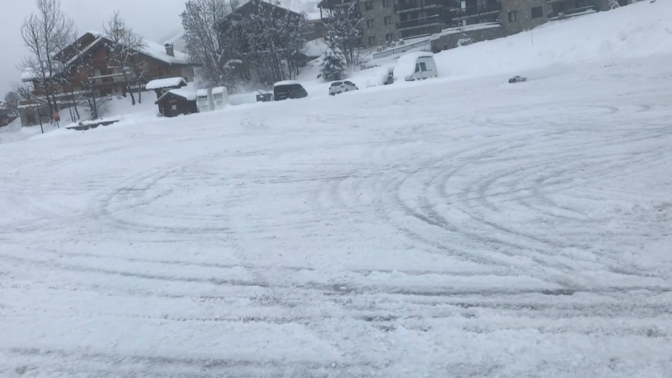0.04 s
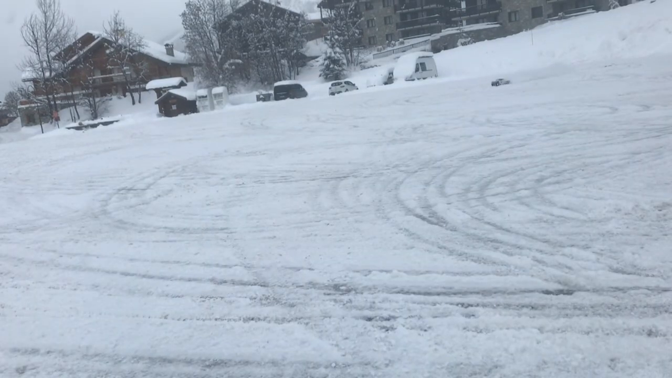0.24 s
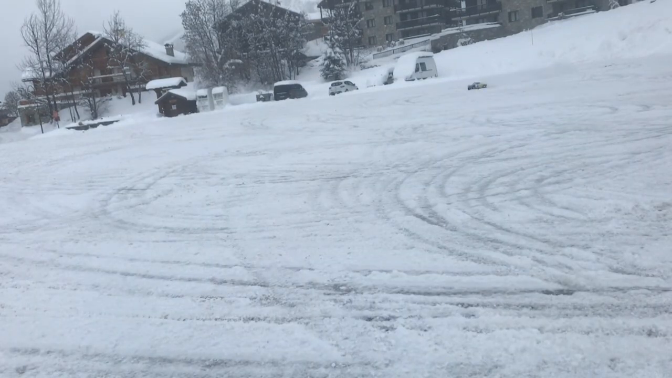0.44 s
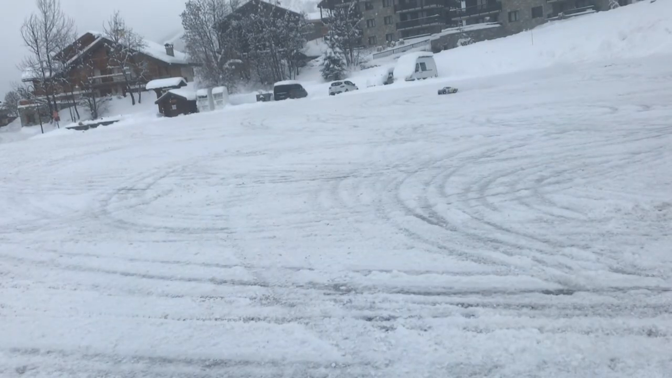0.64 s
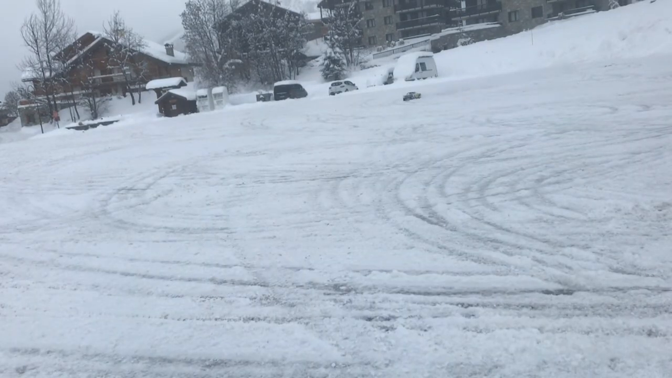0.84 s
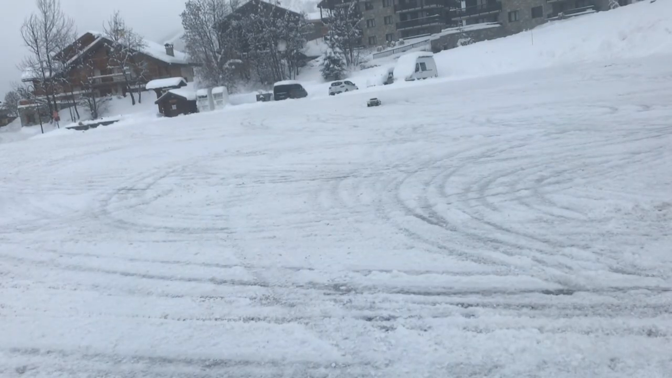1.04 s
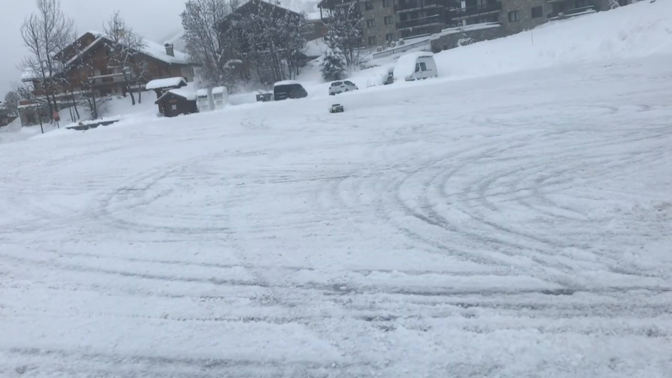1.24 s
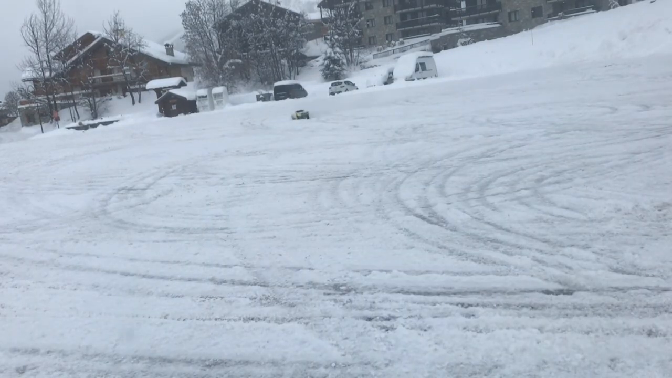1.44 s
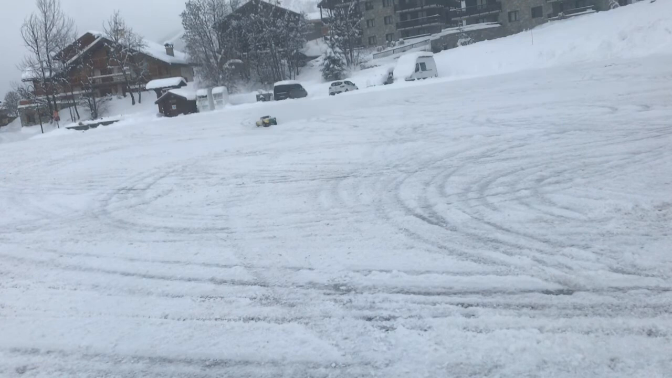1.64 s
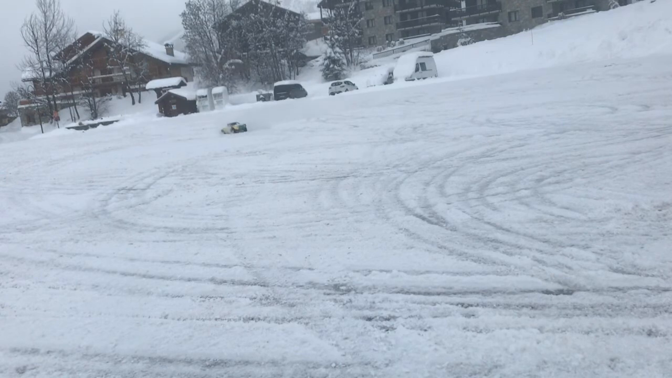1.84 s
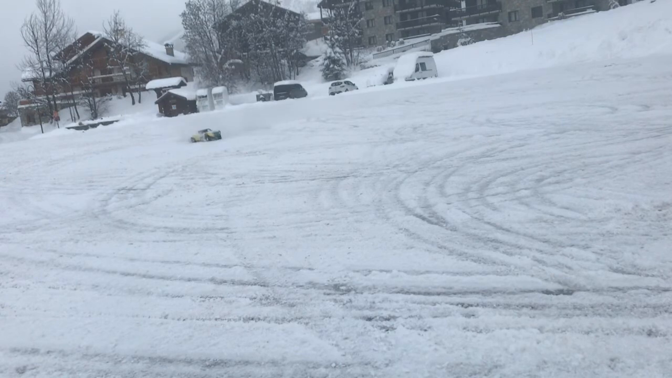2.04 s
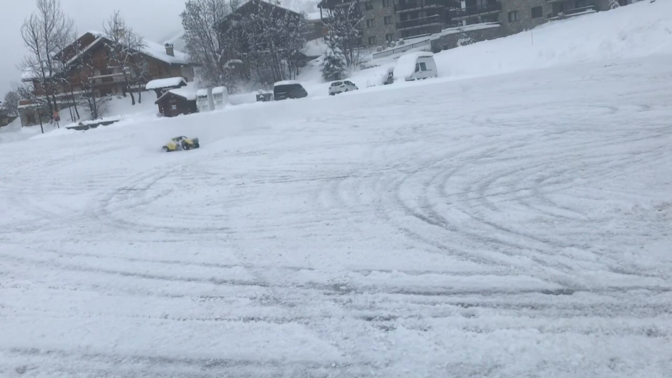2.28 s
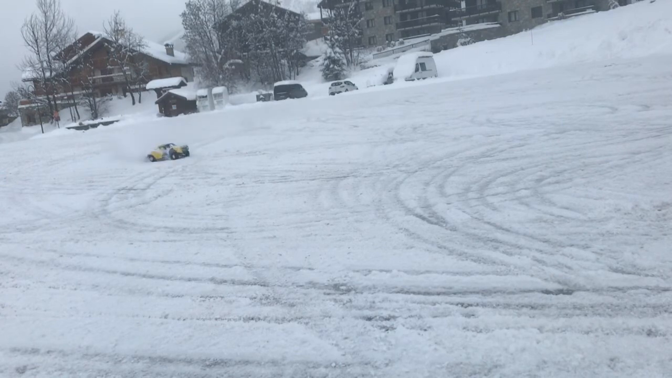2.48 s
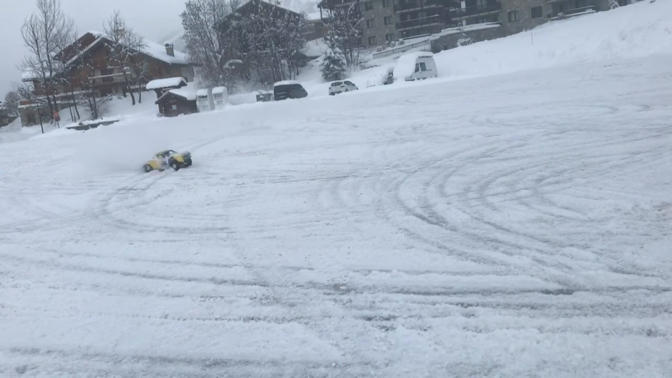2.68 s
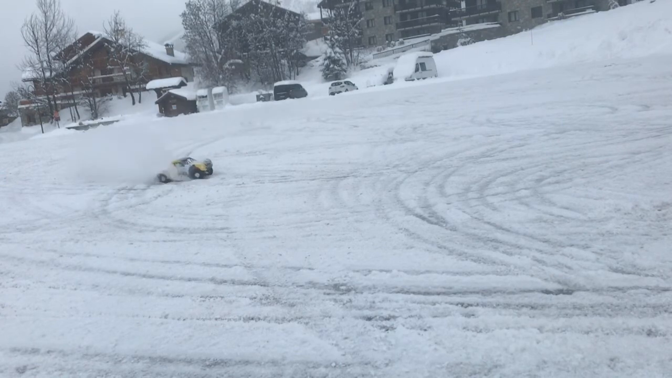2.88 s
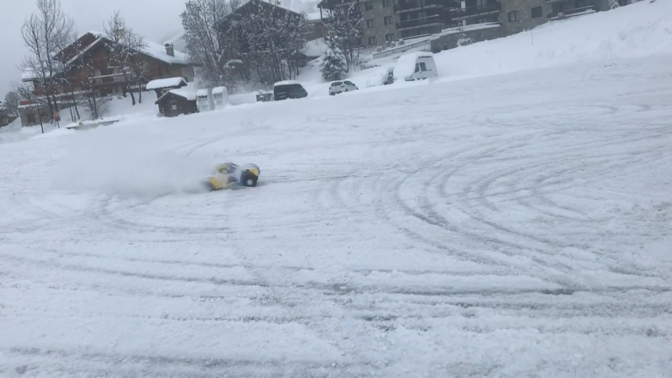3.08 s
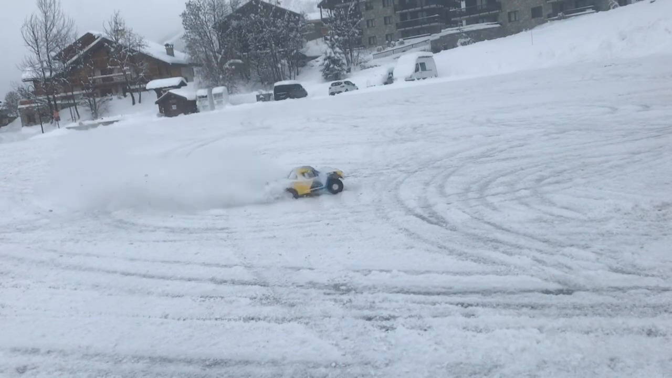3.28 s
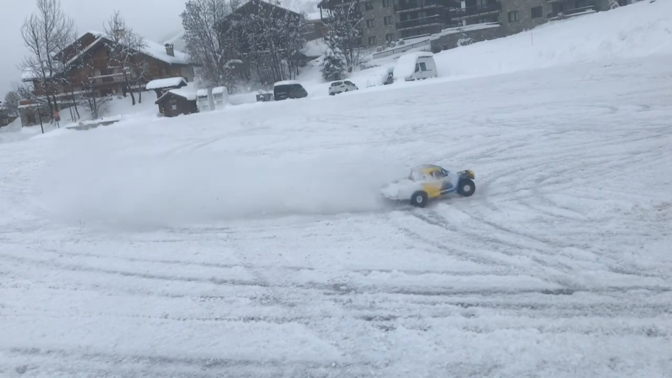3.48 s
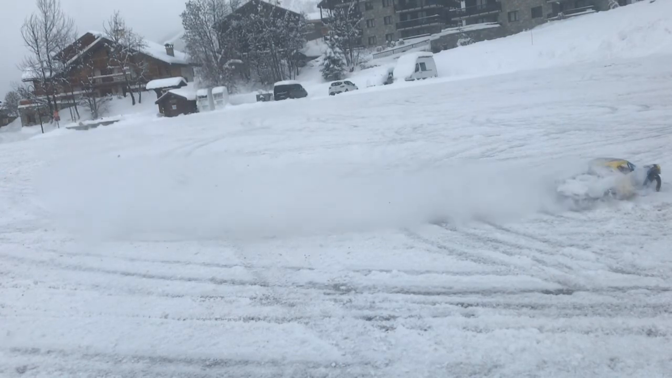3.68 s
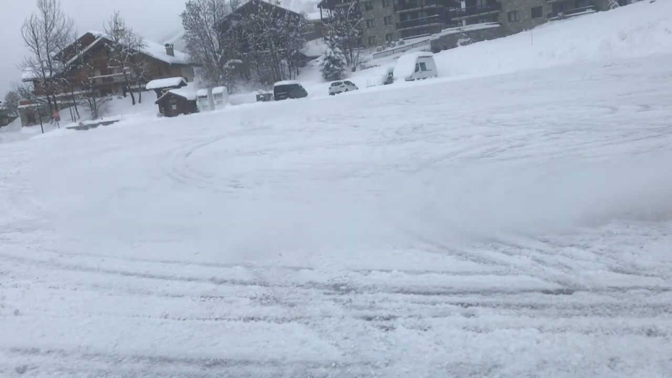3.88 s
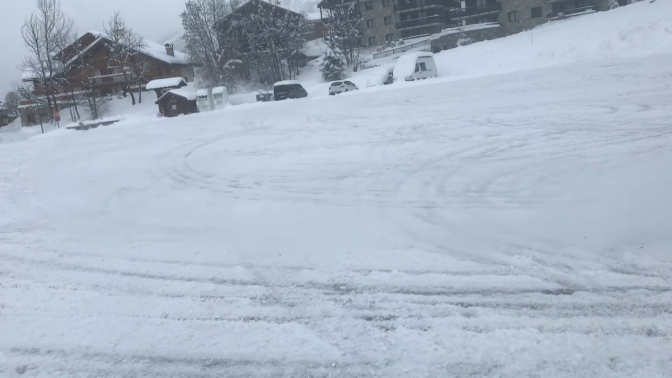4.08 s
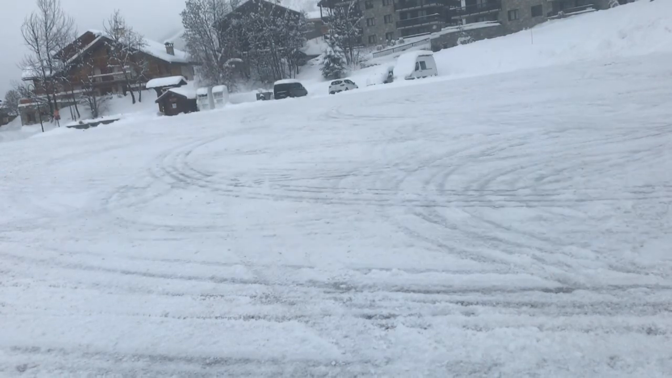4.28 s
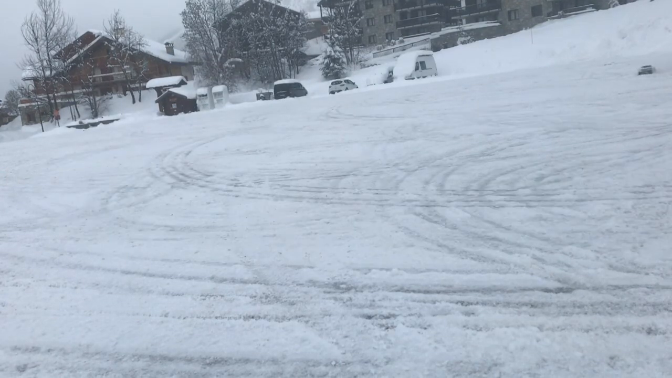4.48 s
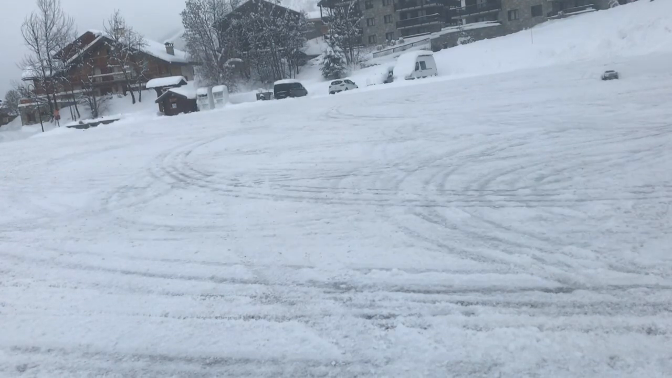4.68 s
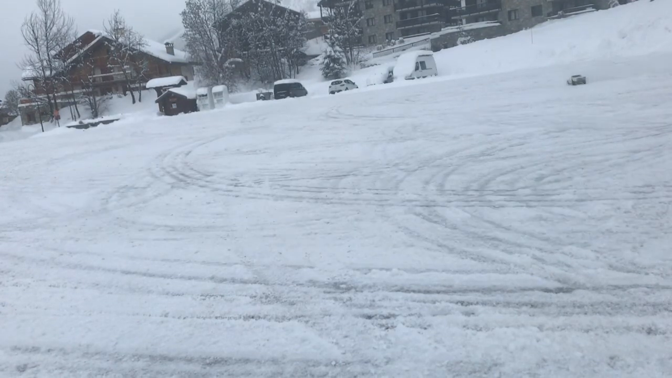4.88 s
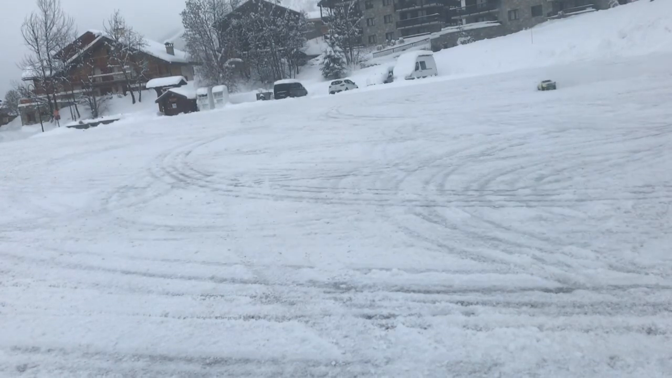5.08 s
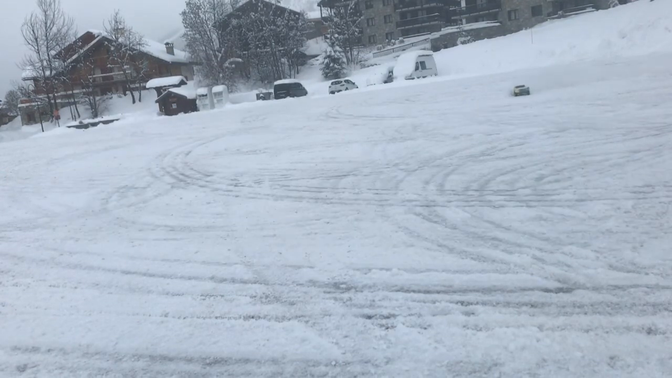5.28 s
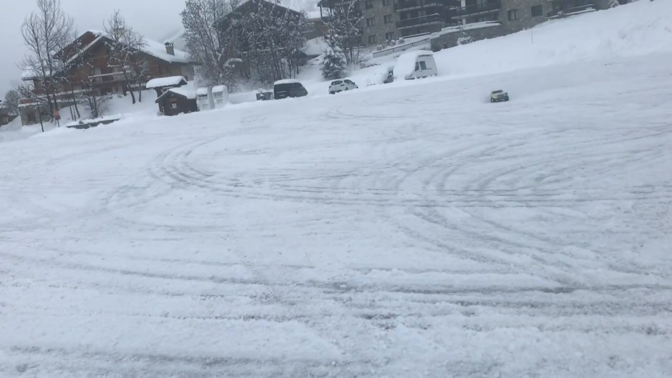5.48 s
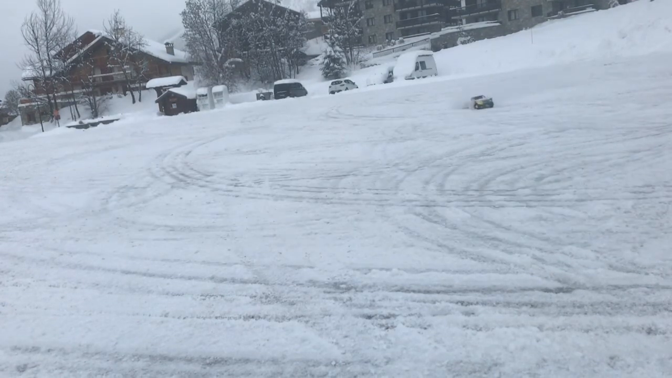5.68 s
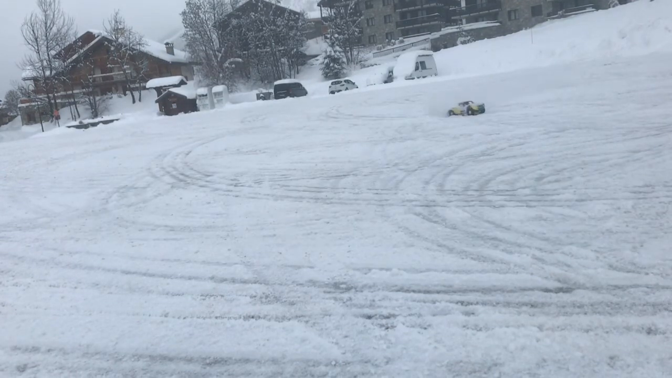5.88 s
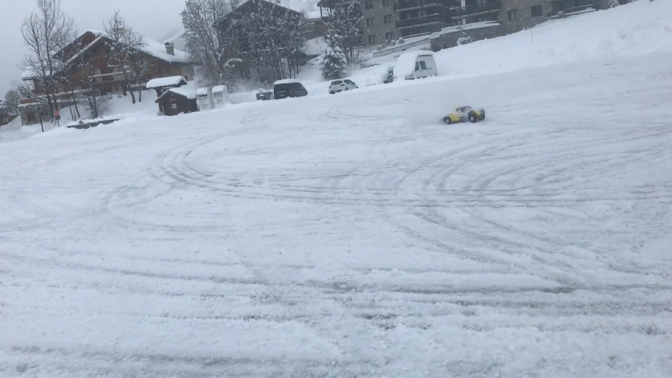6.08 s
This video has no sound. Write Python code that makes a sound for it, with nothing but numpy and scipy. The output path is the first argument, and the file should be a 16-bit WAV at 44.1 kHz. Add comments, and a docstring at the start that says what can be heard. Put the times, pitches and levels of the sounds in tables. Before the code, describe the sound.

A far-off electric buzz with a hollow plastic resonance circles over snow. The whine wavers and briefly bogs as tyres dig in, with squeaky crust, bright spray and little ice clicks. After a noisy close pass with hard crunching bursts, everything suddenly drops quiet; the truck is distant again, then nears with fresh crackles. The microphone stays still outdoors and sounds slightly dull at the very top.

```python
"""A thin shaft tone and plastic drone come first, far across a snowy field, over a faint steady hiss.
A small electric truck circles, comes close and passes the microphone; an abrupt cut returns to a far lap.
Bumps shake its plastic shell, modelled as resonances driven by noise; shaft and gears are wavering sines.
The tyres crunch, hiss, squeak and spray snow: coloured noise and grains, with ticks of ice and rut bursts.
"""
import sys
import numpy as np
from scipy import signal
from scipy.fft import rfft, irfft
from scipy.io import wavfile

SR = 44100
rng = np.random.default_rng(int(sys.argv[2]) if len(sys.argv) > 2 else 0)


def put_to_file(sound):
    """Save the sound as 16-bit audio at rate SR, in the file named by the first command-line argument."""
    columns = np.atleast_2d(sound).T  # one column per channel
    safe = np.clip(columns, -1, 1)
    whole_steps = np.round(safe * 32767)
    wavfile.write(sys.argv[1], SR, whole_steps.astype(np.int16))


N = 270333   # samples
TIME_S = np.arange(N) / SR


def from_db(db):
    """Level in dB to gain."""
    return 10 ** (np.asarray(db) / 20)


def rms_one(x):
    """Scale to unit power."""
    return x / np.sqrt(np.mean(x ** 2) + 1e-20)


def in_time(laps):
    """Join the lap tables and interpolate each column to one value a sample."""
    times_s, *columns = np.transpose(np.concatenate(laps))
    return [np.interp(TIME_S, times_s, column) for column in columns]


def drift(rate_hz):
    """Random wander of spread 1: noise through two equal one-pole low-passes, settled for a second."""
    r = np.exp(-2 * np.pi * rate_hz / SR)
    once = signal.lfilter([1], [1, -r], rng.standard_normal(N + SR))
    return rms_one(signal.lfilter([1 - r], [1, -r], once)[SR:])


def colour(x, spectrum):
    """Shape a sound by (f/Hz, level/dB) points, joined along log frequency; unit power."""
    hz, db = np.transpose(spectrum)
    grid_hz = np.arange(N // 2 + 1) * SR / N + 1   # the 1 keeps the logarithm finite
    gain = from_db(np.interp(np.log(grid_hz), np.log(hz), db))
    return rms_one(irfft(rfft(x) * gain, N))


def resonate(x, hz, width_hz):
    """One two-pole resonance, gain about 1 on top."""
    r = np.exp(-np.pi * width_hz / SR)
    feed = np.array([1, 0, -1]) * (1 - r * r) / 2
    return signal.lfilter(feed, [1, -2 * r * np.cos(2 * np.pi * hz / SR), r * r], x)


def resonate_twice(x, hz, width_hz):
    """The same resonance twice over, for steeper skirts."""
    return resonate(resonate(x, hz, width_hz), hz, width_hz)


def grains(per_s, spread_db):
    """Random clicks of uneven size and either sign; unit power."""
    sizes = from_db(spread_db * np.minimum(rng.exponential(1, N), 5)) * rng.choice([-1, 1], N)
    return rms_one(sizes * (rng.random(N) < per_s / SR))


def bell(at_s, length_s):
    """A smooth Gaussian hump of height 1; the length is its standard deviation."""
    return np.exp(-.5 * ((TIME_S - at_s) / length_s) ** 2)


def swell(events):
    """Sum of level humps in dB, from (t/s, change/dB, length/s) events."""
    return sum(db * bell(at_s, length_s) for at_s, db, length_s in events)


def follow(layer, control_db):
    """Level of a layer: (dB at control 0, share of the control's swing)."""
    return layer[0] + layer[1] * control_db


def wavering_tone(hz, db, rough, waver_hz):
    """A rotating part: a sine whose strength and phase wander with the load."""
    turn = np.exp(2j * np.pi * np.cumsum(hz) / SR)
    load = 1 + rough * (drift(waver_hz) + 1j * drift(waver_hz))
    return from_db(db) * np.real(turn * load) / np.sqrt(.5 + rough ** 2)


def shell(modes, bumps):
    """Bump-driven noise rings each mode; filtering twice keeps the valleys between them dark."""
    shake = rng.standard_normal(N) * bumps
    total = np.zeros(N)
    for k, (hz, width_hz, db) in enumerate(modes):
        ring = rms_one(resonate_twice(shake, hz, 1.8 * width_hz))
        total += (-1) ** k * from_db(db) * ring   # neighbours take opposite signs
    return rms_one(total)


# Plastic shell, low and upper modes: f/Hz, width/Hz (each pass is 1.8 times as wide), relative level/dB
LOW_MODES = [(194.6, 70, -12.5), (289.2, 25.4, -2), (347.4, 41, -5), (432, 122, -9.5)]
UPPER_MODES = [(513, 204, -10.5), (569, 37, -1.5), (632, 50, -13), (681, 28, -10)]
# The drone swells or sinks: t/s, change/dB, length/s
DRONE_SWELLS = [(.5, -2.5, .4), (.98, -6, .1), (4.312, 3.5, .01), (5.286, 4, .064)]
# The upper modes ring more in the far turn: t/s, change/dB, length/s
UPPER_LIFT = (0.77, 2.9, 0.37)
DRONE, UPPER = (-35, 0.89), (-39, 1.67)
UPPER_SWELL_SHARE = 0.27   # the upper modes' share of a drone swell


def plastic_shell(shaken_db, bumps):
    """Bumps ring the thin plastic shell: the main drone, with a brighter group of modes above."""
    swell_db = swell(DRONE_SWELLS)
    low = from_db(follow(DRONE, shaken_db) + swell_db) * shell(LOW_MODES, bumps)
    upper_db = follow(UPPER, shaken_db) + UPPER_SWELL_SHARE * swell_db + swell([UPPER_LIFT])
    return low + from_db(upper_db) * shell(UPPER_MODES, bumps)


# Gear case: f/Hz, width/Hz (each pass is 1.8 times as wide), relative level/dB
CASE_MODES = [(963, 78, 2.5), (1920, 50, -14.5), (2440, 380, -15)]
CASE = (-42.5, 0.84)


def gear_case(facing_db, bumps):
    """The same bumps ring the gear case, louder as the drive side turns to the microphone."""
    return from_db(follow(CASE, facing_db)) * shell(CASE_MODES, bumps)


# Drive shaft, one table a lap: t/s, f/Hz, level/dB
SHAFT = [
    [(0, 330, -50.5), (.2, 333, -40.5), (.3, 333, -77), (.42, 330.7, -42), (.58, 332, -50),
     (.66, 328, -42.5), (.74, 322, -49.5), (.85, 303.4, -54), (.92, 285, -43), (1.0, 264.7, -55),
     (1.08, 297.7, -45), (1.18, 336, -47), (1.28, 322, -55), (1.5, 338.6, -56.5), (1.9, 357.5, -50),
     (2.4, 329.6, -51), (3.3, 325, -44.5), (3.8, 338.4, -52), (3.9, 351, -30.5), (4.0, 321.7, -39.5),
     (4.29, 324.6, -28.5)],
    [(4.297, 327.3, -47.5), (4.5, 318, -45.5), (4.62, 330, -44), (4.8, 322, -52), (5.1, 323, -48),
     (5.9, 335.2, -55), (6.01, 346.5, -35), (6.13, 341, -60)],
]
# The shaft's octave comes forward: t/s, swell/dB, length/s
OCTAVE_SWELLS = [(.55, 6, .05), (.66, 10, .04), (.92, 13, .05), (1.17, 14, .044)]
# Steady hum under the shaft tone while the truck is far: f/Hz, level/dB, middle t/s, length/s
HUM = (287, -48, .45, .3)
SHAFT_OCTAVE_DB = -31   # against the shaft tone
# running light in the far turn, loaded from then on
SHAFT_ROUGH_LIGHT, SHAFT_ROUGH_LOADED, SHAFT_LOADED_S = .2, .4, 1.35


def drive_shaft():
    """The turning shaft gives a wavering tone, a rough octave above it, and an early low hum."""
    hz, db = in_time(SHAFT)
    rough = np.where(TIME_S < SHAFT_LOADED_S, SHAFT_ROUGH_LIGHT, SHAFT_ROUGH_LOADED)
    tone = wavering_tone(hz, db, rough, 20.5)
    octave = wavering_tone(2 * hz, db + SHAFT_OCTAVE_DB + swell(OCTAVE_SWELLS), 1.0, 18.0)
    hum_hz, hum_db, hum_at_s, hum_length_s = HUM
    hum = wavering_tone(np.full(N, hum_hz), hum_db, SHAFT_ROUGH_LIGHT, 4.5)
    return tone + octave + bell(hum_at_s, hum_length_s) * hum


# The gears bog down for a moment: t/s, drop/Hz, length/s
BOGS = [(1.471, 50.57, 0.043), (1.867, 24.9, .06), (2.095, 42.1, 0.019), (2.283, 24.8, .025),
        (2.495, 54.63, .04), (2.689, 41.1, .025), (2.975, 45.5, 0.0505), (3.159, 47, 0.039),
        (3.405, 28.45, 0.052)]
WHINE = (-34, 0.84)
WHINE_ON_S, WHINE_OFF_S, WHINE_FADE_DB_PER_S = 1.53, 3.9, 70
WHINE_HZ, WHINE_SAG_FROM_S, WHINE_SAG_HZ_PER_S = 1003, 3.3, 60   # the sag lasts one second
WHINE_ROUGH, WHINE_ROUGH_PER_DB, WHINE_WAVER_HZ = .6, .018, 9


def gears(facing_db):
    """The whine wavers under load, rougher when loud, bogs down briefly and sags as the truck leaves."""
    sag_hz = WHINE_SAG_HZ_PER_S * np.clip(TIME_S - WHINE_SAG_FROM_S, 0, 1)
    hz = WHINE_HZ - sag_hz - swell(BOGS)   # the same humps, here in Hz
    idle_s = np.maximum(WHINE_ON_S - TIME_S, 0) + np.maximum(TIME_S - WHINE_OFF_S, 0)
    db = follow(WHINE, facing_db) - WHINE_FADE_DB_PER_S * idle_s
    rough = np.maximum(WHINE_ROUGH + WHINE_ROUGH_PER_DB * facing_db, .15)
    return wavering_tone(hz + WHINE_WAVER_HZ * drift(20.9), db, rough, 48.0)


# Faint tone sliding up in the far turn: t/s, f/Hz, rise/Hz per s, level/dB, length/s
RISING_STRAND = (.7, 650, 900, -59, .03)


def strand():
    """A short rough upward glide of one wavering sine."""
    at_s, hz, rise_hz_per_s, db, length_s = RISING_STRAND
    glide_hz = np.clip(hz + rise_hz_per_s * (TIME_S - at_s), 0, 2 * hz)
    return bell(at_s, length_s) * wavering_tone(glide_hz, db, .6, 25.)


# Tyres on the ground: f/Hz, relative level/dB per Hz
RUMBLE = [(20, -55), (40, -14), (60, -10.5), (100, -6), (170, -6.5), (260, 1.5), (400, -41)]
# The chassis lands: t/s, swell of the rumble/dB, length/s
THUDS = [(2.603, 2.5, .02), (2.657, 4, .022), (2.991, 6, .02)]
GROUND = (-49.5, 0.39)


def ground_rumble(thrown_db):
    """Tyres rolling on the ground: low coloured noise that swells where the chassis lands."""
    rumble_db = follow(GROUND, thrown_db) + swell(THUDS)
    return from_db(rumble_db) * colour(rng.standard_normal(N), RUMBLE)


def snow(spectrum, db, ground, grain, patchy_db):
    """Dense noise with some grains; bumps of the ground and fast patches shape it."""
    rush = colour(rng.standard_normal(N) + grain * grains(900., 4.7), spectrum)
    return rush * from_db(db + 0.6 * ground + patchy_db * drift(35.0))


SQUEAKS_PER_S, SQUEAK_WIDTH_HZ = 300, 50


def squeaks():
    """Crust chirps as it breaks: random grains dealt to narrow resonances from 1.3 to 7 kHz."""
    clicks, dealt = grains(SQUEAKS_PER_S, 2.8), rng.integers(0, 24, N)
    total = np.zeros(N)
    for k, hz in enumerate(np.geomspace(1300, 7000, num=24)):
        own_clicks = clicks * (dealt == k) + 1e-18   # the tiny offset keeps the filter numbers normal
        total += resonate(own_clicks, hz, SQUEAK_WIDTH_HZ)
    return rms_one(total)


# Packed snow: f/Hz, relative level/dB per Hz
CRUNCH = [(400, -28.5), (700, 0), (810, -3.5), (1000, -3), (1400, -7.5), (2000, -12.5), (2500, -18.5),
          (5200, -39), (7000, -36)]
# Cut crust: f/Hz, relative level/dB per Hz
HISS = [(1500, -52), (2400, -11), (3000, 1), (4100, 0.5), (4950, 1.5), (6100, -2.5), (7400, -7),
        (10000, -18)]
# The tyres dig in: t/s, crunch change/dB (before the crunch's share), hiss change/dB, length/s
DIGS = [(0.72, 5, 2, 0.029), (1.143, 6, 3.5, .05), (1.376, 7, 4, 0.058), (1.716, 6, 0.5, 0.037),
        (2.792, 3.5, 0.5, 0.044), (3.218, 7.5, 4.5, 0.041), (3.474, 3, -0.5, 0.073),
        (3.663, 4.5, 1.5, 0.079), (4.013, -3, 3, 0.066), (4.186, -0.5, 2.5, 0.18), (4.435, 12.5, 7, 0.085),
        (5.714, 3, 2, 0.04), (5.997, 4.5, -1, 0.18)]
CRUNCHING, HISSING = (-39, 1.166), (-45.5, 1)
HISS_THROWN_SHARE = 0.38   # the hiss follows thrown snow this far, nearness for the rest
SQUEAK_DB = -7.5   # against the hiss


def packed_snow(near_db, thrown_db, ground):
    """Tyres crunch packed snow and cut its hissing, squeaking crust; digging in changes the levels."""
    crunch_db = near_db + swell([(at_s, db, length_s) for at_s, db, _, length_s in DIGS])
    hiss_db = near_db + HISS_THROWN_SHARE * (thrown_db - near_db)
    hiss_db = follow(HISSING, hiss_db + swell([(at_s, db, length_s) for at_s, _, db, length_s in DIGS]))
    crunch = snow(CRUNCH, follow(CRUNCHING, crunch_db), ground, 0.41, 1.98)
    hiss = snow(HISS, hiss_db, ground, 0.44, 1.88)
    return crunch + hiss + from_db(hiss_db + SQUEAK_DB) * squeaks()


# Thrown powder: f/Hz, relative level/dB per Hz
POWDER = [(4000, -24), (7000, -2.5), (8800, -1.5), (12500, -9), (16000, -28)]
# Single crystals: f/Hz, relative level/dB per Hz
SPARKLE = [(6000, -13), (10000, -1), (13000, -3), (15000, -10), (16000, -7)]
# Flurries of crystals: t/s, swell/dB, length/s
FLURRIES = [(1.4, 16, 0.087), (2.85, 14, .15), (5.46, 10, 0.037), (5.74, 15, .16)]
POWDERING = (-53, 1)


def thrown_snow(thrown_db, ground):
    """Flung powder is bright grainy noise; single crystals are sparse bright grains that flurry."""
    powder_db = follow(POWDERING, thrown_db)
    sparkle_db = powder_db - 16 + swell(FLURRIES) + 3. * drift(25.0)
    sparkle = from_db(sparkle_db) * colour(grains(400., 2.8), SPARKLE)
    return snow(POWDER, powder_db, ground, 0.73, 1.8) + sparkle


# Wheels hitting ruts: t/s, level/dB (played 10.5 dB lower, then dying), centre f/Hz
RUTS = [(1.702, -48, 2630), (1.753, -50, 2900), (1.789, -49, 2900), (2.595, -41, 3317), (2.639, -47, 1883),
        (3.188, -32, 2132), (3.5174, -24.5, 2240), (3.595, -23, 1790), (3.669, -26, 2110),
        (3.894, -24.5, 1810), (3.929, -26, 1923), (3.967, -21.5, 3090), (4.018, -39, 2960),
        (5.676, -56, 1596), (5.85, -46, 2500), (6.01, -34, 1506)]
RUT_T60_S = 0.1   # time to fall 60 dB


def ruts():
    """Each rut breaks crust: a dying burst of noise around its own pitch."""
    out, t = np.zeros(N), np.arange(SR // 10) / SR
    for at_s, db, hz in RUTS:
        burst = rms_one(resonate(rng.standard_normal(len(t)), hz, .6 * hz))
        decay = from_db(db - 10.5 - 60 * t / RUT_T60_S)
        attack = np.minimum(t / 0.0018, 1)
        start = round(at_s * SR)
        out[start:start + len(t)] += burst * decay * attack
    return out


# Wheels churning deep snow or flinging fine powder: t/s, level/dB at the hump, centre f/Hz, length/s
CHURNS = [(1.75, -59, 2900, .045), (3.44, -44, 2100, .06), (3.58, -44, 2000, .05), (3.68, -41, 2200, .018),
          (2.42, -64, 8600, .1), (4.05, -62, 12200, .15)]


def churns():
    """Grainy roar around one broad pitch, its level fluttering at random."""
    rush = rng.standard_normal(N) + 0.71 * grains(1600.0, 8.4)
    total = np.zeros(N)
    for at_s, db, hz, length_s in CHURNS:
        roar = rms_one(resonate_twice(rush, hz, 0.45 * hz))
        total += from_db(db) * bell(at_s, length_s) * roar
    return total * from_db(2. * drift(39.9))


# Brief squeals of the spinning tyres: t/s, f/Hz, level/dB at the hump
SQUEALS = [(3.98, 2916, -47), (4.62, 3070, -70)]
SQUEAL_S = 0.076


def squeals():
    """Spinning tyres squeal: very rough short tones."""
    return sum(bell(at_s, SQUEAL_S) * wavering_tone(np.full(N, hz), db, 3.6, 91.0)
               for at_s, hz, db in SQUEALS)


# Ice lumps and flakes that tick: t/s, peak level/dB, centre f/Hz
TICKS = [(0.792, -42, 12530), (1.702, -37.5, 2800), (1.730, -40, 2200), (1.856, -36, 4756),
         (2.0272, -39, 11500), (2.33, -33, 5200), (2.3958, -36, 6000), (2.4617, -37, 5200),
         (2.595, -34.5, 2500), (2.736, -26, 4980), (2.796, -34, 8930), (2.8298, -27, 4540),
         (2.925, -28.5, 8850), (3.066, -33, 4240), (3.081, -23.5, 4290), (5.4111, -48, 10100),
         (5.448, -39, 10800), (5.5794, -44, 7930), (5.611, -34, 7500), (5.6525, -58, 11000),
         (5.679, -46, 11500), (5.6872, -32.5, 10000), (5.7209, -44, 13500), (5.8275, -45.5, 12770),
         (5.882, -46, 11940), (5.906, -32, 8280)]


def ticks():
    """Each ice tick is a click in a very short bright resonance."""
    out = np.zeros(N)
    for at_s, db, hz in TICKS:
        start, click = round(at_s * SR), np.zeros(200)
        click[0] = 1
        ring = resonate_twice(click, hz, 0.74 * hz)
        out[start:start + 200] += from_db(db) * ring / np.abs(ring).max()
    return out


# Distant hiss over the field: f/Hz, relative level/dB per Hz
AIR = [(800, -20), (1800, 8), (2200, 8.5), (3300, 6.5), (4200, 2), (4950, -28), (6200, 11), (7600, -1),
       (9000, -31), (16000, -12)]
AIR_DB = -71.5


def field_air():
    """The open field behind it all: faint steady coloured noise."""
    return from_db(AIR_DB) * colour(rng.standard_normal(N), AIR)


# The truck as the microphone meets it, one table a lap: t/s, then control levels/dB for nearness,
# thrown snow, drive side turned to the listener, shaking of the shell
TRUCK = [
    [(0, -35, -26, -33, -13.5), (.35, -29, -24, -35.5, -13.5), (.7, -27, -21.5, -32, -11),
     (1.3, -27, -18.5, -32, -13), (1.8, -17, -12.5, -29, -12), (2.5, -10, -8, -21, -5.5),
     (2.82, -5.5, 1, -12.5, -2), (3.08, -4.5, 0, -13.5, -0.5), (3.2, -7.5, -1, -3, -1),
     (3.5, -0.5, 3.5, 2, 2.5), (3.8, -1.5, -1, -12.5, 1.5), (4.0, 6.5, -4.5, -10, 3),
     (4.292, -2, 0, -11, -1.5)],
    [(4.297, -34, -18, -34, -14), (4.8, -21, -19.5, -32, -13), (5.35, -22, -13, -26, -11.5),
     (5.9, -15.5, -7, -9.5, -6), (6.13, -13, -8, -3.5, -1.5)],
]


def scene():
    """The truck's path drives its layers; shell, gear case and snow share the bumps of the ground."""
    near_db, thrown_db, facing_db, shaken_db = in_time(TRUCK)
    ground = drift(71.0)
    bumps = from_db(1.6 * ground + 0.87 * drift(11.0))
    body = plastic_shell(shaken_db, bumps) + gear_case(facing_db, bumps)
    drive = drive_shaft() + gears(facing_db) + strand()
    tyres = ground_rumble(thrown_db) + packed_snow(near_db, thrown_db, ground)
    tyres += thrown_snow(thrown_db, ground) + ruts() + churns() + squeals()
    return (body + drive + tyres + ticks() + field_air())[None]


# Hollows in the microphone's treble: f/Hz, width/Hz, depth (0-1)
HOLLOWS = [(2170, 230, 0.19), (4890, 1580, 0.56), (7650, 1900, 0.35), (10450, 1170, 0.49)]
CUTOFF_HZ = 15780


def record(dry):
    """The small microphone loses deep bass, has hollows in the treble, and the top is cut."""
    dry = signal.sosfilt(signal.butter(2, 45., "high", fs=SR, output="sos"), dry)
    for hz, width_hz, depth in HOLLOWS:
        dry = dry - np.clip(depth, 0, 1) * resonate(dry, hz, width_hz)
    return signal.sosfilt(signal.ellip(12, .5, 70, CUTOFF_HZ, fs=SR, output="sos"), dry)


dry = scene()
out = record(dry)
put_to_file(out)
```